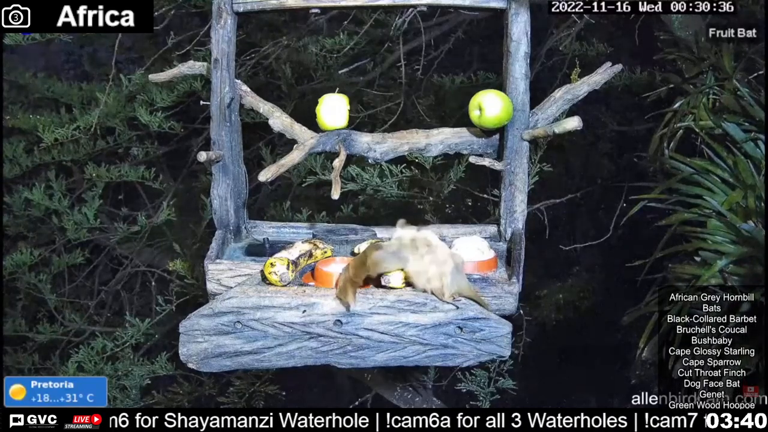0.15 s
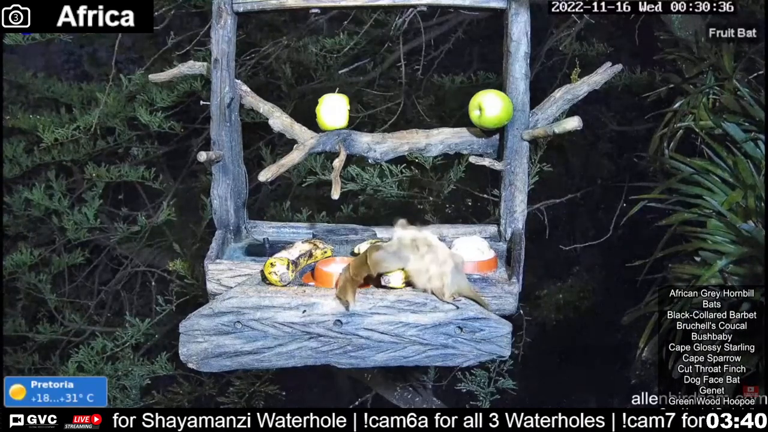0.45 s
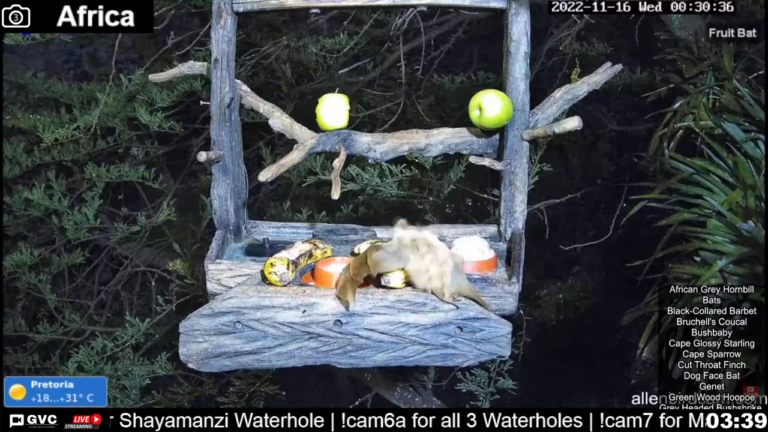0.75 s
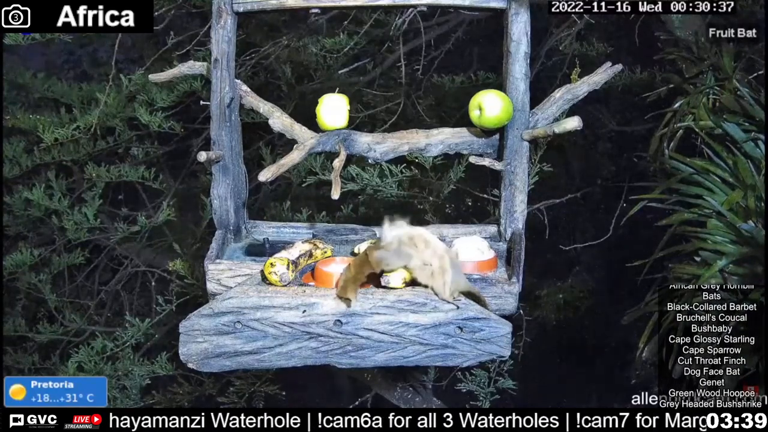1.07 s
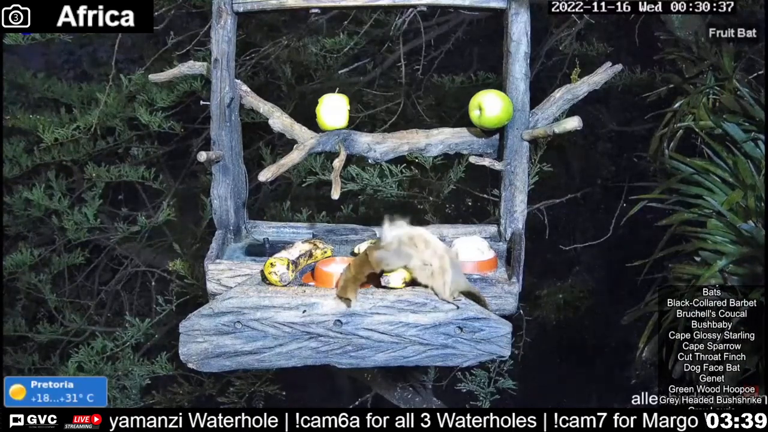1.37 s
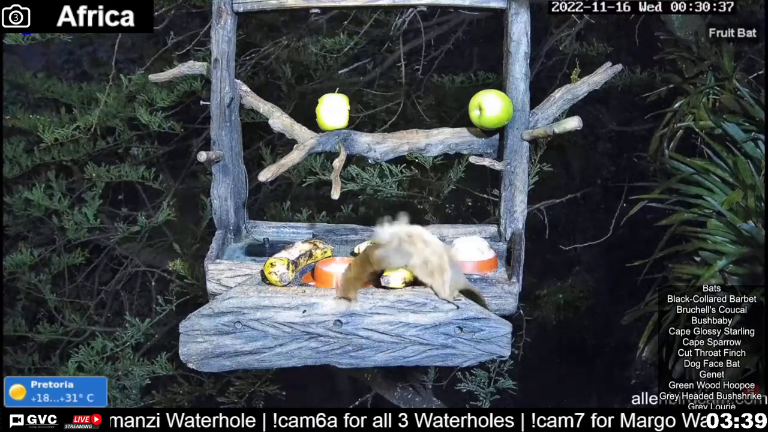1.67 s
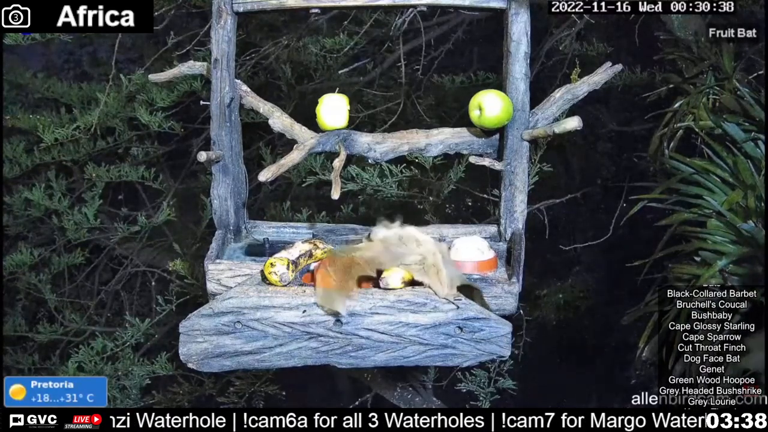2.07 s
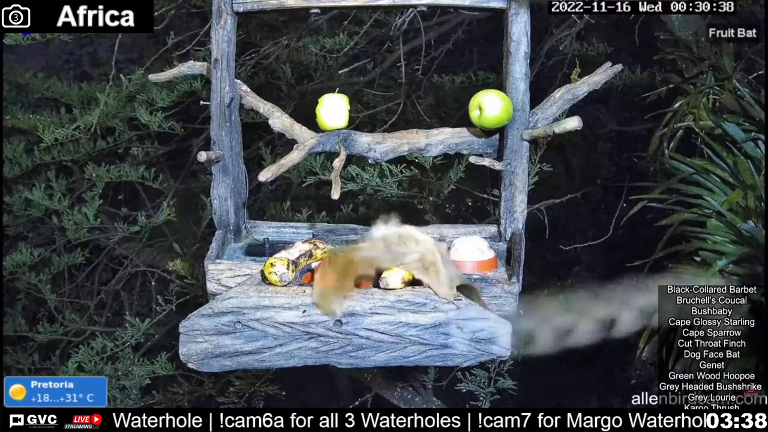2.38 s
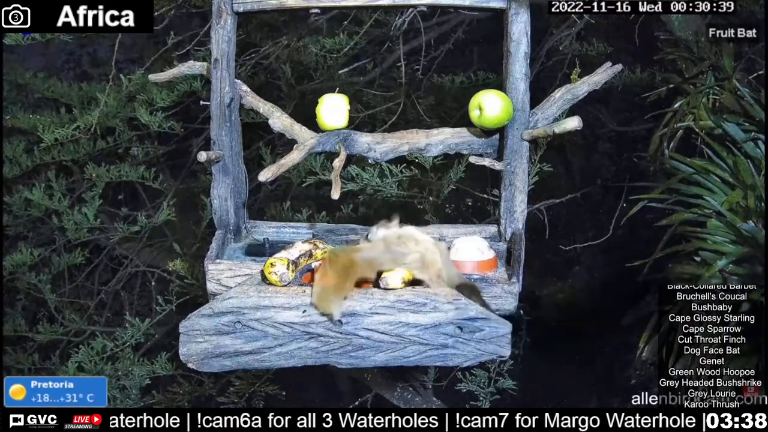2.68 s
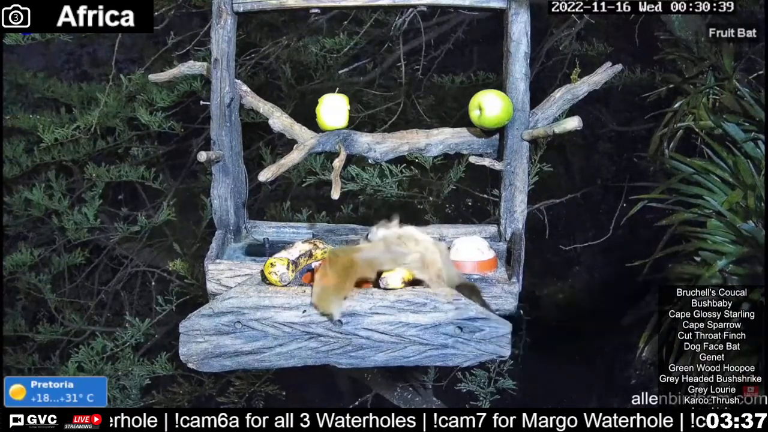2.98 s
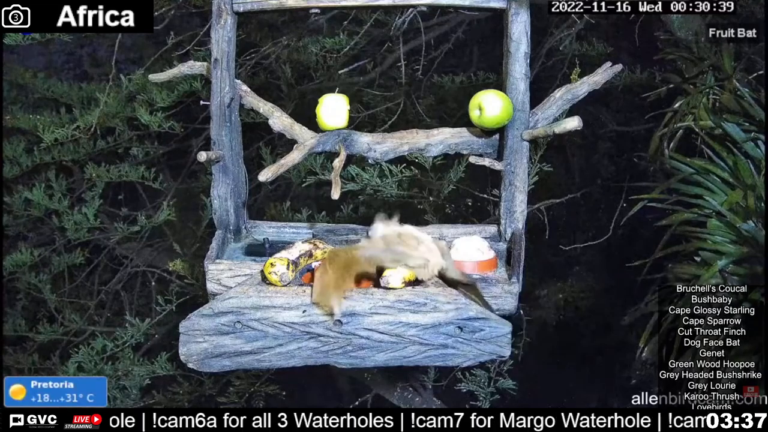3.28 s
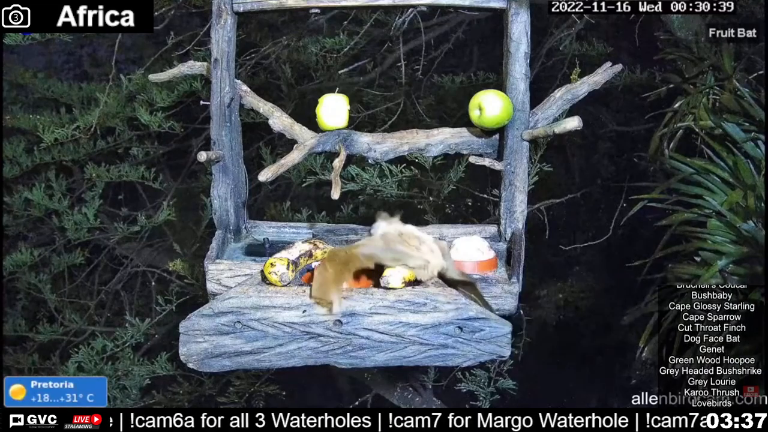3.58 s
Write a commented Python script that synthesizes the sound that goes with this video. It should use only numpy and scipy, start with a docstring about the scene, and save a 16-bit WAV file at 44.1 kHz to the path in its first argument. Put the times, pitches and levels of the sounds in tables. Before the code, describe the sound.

A fruit bat gives short, harmonic falling chirps at about 1.0, 2.0 and 3.3 seconds, ringing briefly among trees. Two near frogs croak in pulsed runs throughout, the lower one busiest around 2.0-2.7, over a swelling distant chorus. High crickets trill intermittently. Wet feeding clicks are sharpest near 1.1 and 1.8. Faint insect whine and soft night hiss continue; sound sits almost entirely right.

```python
"""A fruit bat at a garden feeding table at night: three falling harmonic chirps that ring among the trees.
Two near frogs croak in pulse runs through throat filters; random pulses make the far frog chorus behind.
Two crickets, one near 5.9 kHz and one near 3.8 kHz, trill in short falling whistles.
Feeding animals make wet clicks from noise snaps and smears. Band-passed noise is the far insects,
coloured noise the night air. Nearly all sound is on the right."""
import sys
import numpy as np
from scipy import signal
from scipy.io import wavfile
from scipy.ndimage import uniform_filter1d

SR = 44100
rng = np.random.default_rng(int(sys.argv[2]) if len(sys.argv) > 2 else 0)


def master_out(mix):
    """Clip the mix to full scale and print it as 16-bit PCM to the path in sys.argv[1]."""
    frames = np.transpose(np.atleast_2d(mix))
    ceiling = np.clip(frames, -1, 1)
    pcm = np.round(ceiling * 32767).astype(np.int16)
    wavfile.write(sys.argv[1], SR, pcm)


N = 164934


def amp(db):
    """Decibels to gain."""
    return 10 ** (np.asarray(db) / 20)


def unit(x):
    """Scales to rms 1."""
    return x / np.sqrt(np.mean(x ** 2) + 1e-20)


def smooth_noise(count, size):
    """Noise averaged over a sliding window of size samples, rms 1."""
    return unit(uniform_filter1d(rng.standard_normal(count), size=size))


def read(points, hz):
    """Reads a spectrum on a log-frequency axis."""
    point_hz, value = np.transpose(points)
    return np.interp(np.log(hz + 1), np.log(point_hz + 1), value)


def level(points):
    """Gain over time from a level curve in dB."""
    return amp(np.interp(np.arange(N) / SR, *np.transpose(points)))


def add(mix, start_s, sound):
    """Mixes a sound in at a time."""
    part = mix[max(round(start_s * SR), 0):][:len(sound)]
    part += sound[:len(part)]


def colour(x, points):
    """Causal minimum-phase filter with the given spectrum."""
    log_gain = np.log(amp(read(points, abs(np.fft.fftfreq(8192, 1 / SR)))))
    response = np.exp(np.conj(signal.hilbert(log_gain)))
    taps = np.fft.ifft(response).real[:2048]
    return signal.fftconvolve(x, taps)[:len(x)]


def patchy(x, patch_db):
    """Lets narrow bands of a sound swell and fade at random."""
    z = signal.stft(x, nperseg=512)[2]
    patches = uniform_filter1d(rng.standard_normal(z.shape), size=3, axis=0)
    patches = uniform_filter1d(patches, size=7, axis=1)
    return signal.istft(z * amp(patch_db * unit(patches)), nperseg=512)[1][:N]


# Echo decay among the trees. Each row: frequency in Hz, time to fall 60 dB in seconds.
TREE_DECAY_HZ_S = [(1300, 0.27), (3300, 0.49), (6000, 0.42), (14000, 0.56)]


def trees(x):
    """Scattered echoes from trunks and leaves: sparse random taps, decay set by frequency."""
    taps = rng.standard_normal(SR) * (rng.random(SR) < .06)
    hz, t, z = signal.stft(taps, SR, nperseg=256)
    decay = amp(-60 * t / read(TREE_DECAY_HZ_S, hz)[:, None])
    tail = signal.istft(z * decay * (t > .004), SR, nperseg=256)[1]
    return signal.fftconvolve(x, tail / np.linalg.norm(tail))[:len(x)]


# Bat chirps. Each row: start in seconds, length in seconds, first pitch in Hz, last pitch in Hz,
# fall time in seconds, level in dB before the fades, tilt in dB per harmonic.
CHIRPS = [(1.016, 0.09, 1867, 1644, .034, -36, -1.5), (2.045, 0.065, 1818, 1648, 0.02, -31.5, -1.5),
          (3.33, 0.067, 1832, 1626, 0.01336, -33, -3)]
# Bat mouth resonances. Each row: frequency in Hz, gain in dB.
MOUTH_HZ_DB = [(1650, -13), (3280, -4), (3700, -8.5), (4900, -3.5), (5450, -0.5), (6500, -7.5),
               (7400, -15.5), (8300, -32.5)]
CHIRP_RISE_S, CHIRP_RELEASE_S, CHIRP_ECHO_DB = 0.012, 0.0054, 3
CHIRP_JITTER = .0065  # rms, fraction of pitch


def bat(flutter_db=0.5):
    """Each chirp is a five-harmonic whistle that drops towards its last pitch, shaped by the mouth."""
    out = np.zeros(N)
    for start_s, length_s, first_hz, last_hz, fall_s, db, tilt_db in CHIRPS:
        t = np.arange(0, length_s, 1 / SR)
        jitter = smooth_noise(SR, 60)[:len(t)]
        glide_hz = last_hz + (first_hz - last_hz) * np.exp(-(t / fall_s) ** 1.5)
        hz = glide_hz * (1 + CHIRP_JITTER * jitter)
        phase = 2 * np.pi * np.cumsum(hz) / SR
        tone = sum(amp(read(MOUTH_HZ_DB, k * hz) + tilt_db * k) * np.sin(k * phase) for k in range(1, 6))
        tone *= amp(flutter_db * smooth_noise(SR, 200)[:len(t)])
        rise = np.minimum(t / CHIRP_RISE_S, 1)
        release = np.minimum((length_s - t) / CHIRP_RELEASE_S, 1)
        call = np.pad(amp(db) * unit(tone) * rise * release, (0, SR))
        echo = amp(CHIRP_ECHO_DB) * call.std() * unit(trees(call))
        add(out, start_s, call + echo)
    return out


# Croaks of the higher and lower frog. Each row: start in seconds, level in dB before the frog's gain.
HIGH_CROAKS = [(0.0618, -24), (0.3345, -35), (0.5117, -25.5), (0.637, -26.5), (0.7096, -23), (0.838, -21),
               (0.8881, -22.5), (0.9523, -23.5), (1.007, -21), (1.0797, -20), (1.138, -23), (1.201, -22),
               (1.258, -26), (1.3159, -22), (1.4214, -21.5), (1.4671, -20.5), (1.73, -23.5),
               (1.8475, -22.5), (1.922, -22), (2.5232, -23.5), (2.7351, -23), (2.8924, -20), (2.967, -26.5),
               (3.1525, -21.5), (3.2265, -25), (3.29, -24), (3.4188, -21), (3.4786, -25), (3.5046, -21.5),
               (3.6437, -22), (3.6966, -21.5)]
LOW_CROAKS = [(0.027, -34.5), (0.596, -31.5), (0.669, -33.5), (0.756, -30.5), (1.666, -38.5),
              (1.711, -36.5), (1.993, -29), (2.063, -28.5), (2.137, -31.5), (2.207, -31.5), (2.274, -31),
              (2.34, -30.5), (2.401, -31.5), (2.463, -29.5), (2.572, -29), (2.629, -30), (2.716, -36.5),
              (3.354, -29)]
# Throat resonances of each frog. Each row: frequency in Hz before tuning scatter, relative gain in dB.
HIGH_THROAT_HZ_DB = [(300, -80), (720, -54.5), (850, -19), (1080, -13.5), (1240, 0.5), (1400, -8.5),
                     (1800, -33.5), (2500, -22), (8000, -93.5)]
LOW_THROAT_HZ_DB = [(300, -75.5), (730, -44.5), (830, -4.5), (1130, -1.5), (1400, -10), (1800, -20),
                    (2700, -23), (9000, -89.5)]
HIGH_DB, LOW_DB, CROAK_ECHO_DB = -3.5, 1.5, -7.5
CROAK_PULSE_S, CROAK_FADE_DB = .0052, -2.5  # mean gap and loss from pulse to pulse
CROAK_TUNING = 0.029  # resonance scatter between croaks, fraction


def frog(croaks, throat, gain_db, count=4, scatter_db=1):
    """Each croak is a quick run of fading pulses that ring the throat."""
    out = np.zeros(N)
    for (start_s, db), chance in zip(croaks, rng.standard_normal((len(croaks), count, 2))):
        pulses = np.zeros(2048)
        for k, (late, strong) in enumerate(chance):
            pulse_s = CROAK_PULSE_S * (k + .15 * late * (k > 0))
            add(pulses, pulse_s, amp([k * CROAK_FADE_DB + scatter_db * strong]))
        tuned = np.array(throat) * [1 + CROAK_TUNING * chance[0, 0], 1]
        add(out, start_s, amp(db + gain_db) / 2 * unit(colour(pulses, tuned)))
    return out + amp(CROAK_ECHO_DB) * trees(out)


# Far chorus, its raspy treble and the deep distant croaking.
# Level rows: time in seconds, level in dB before the layer's gain.
CHORUS_LEVEL_S_DB = [(0, -32), (.14, -36), (.25, -53), (.47, -44.5), (.62, -37), (.83, -31), (1.15, -29.5),
                     (1.43, -33), (1.85, -29), (2.33, -37), (2.85, -30), (3.74, -30)]
RASP_LEVEL_S_DB = [(0, -39), (.14, -42), (.28, -62), (.52, -45), (0.78, -41.5), (1.301, -40.5),
                   (1.421, -43), (1.7, -40), (3.049, -41), (3.74, -38)]
DEEP_LEVEL_S_DB = [(0, -48), (.14, -58.5), (.3, -75.5), (.46, -70.5), (.56, -65), (1.15, -51), (1.5, -60.5),
                   (1.95, -58), (2.85, -57.5), (3.74, -53)]
# Spectrum rows: frequency in Hz, relative gain in dB.
CHORUS_HZ_DB = [(250, -65), (720, -55.5), (820, -15), (1020, -10), (1220, 2), (1380, -6), (1550, -13.5),
                (1900, -35.5), (6500, -95)]
RASP_HZ_DB = [(400, -53.5), (1800, -2), (2200, 7), (2650, 7.5), (3000, -4.5), (3300, -2.5), (3650, -9),
              (4050, -11), (4750, -7.5), (5200, -15), (6300, -18), (11000, -80.5)]
DEEP_HZ_DB = [(70, -61.5), (200, -31.5), (340, -14), (455, 7.5), (520, 3), (620, -14), (1200, -58)]


def chorus(spectrum, curve, per_s, spread_db, echo_db, gain_db):
    """Many far frogs: random throat pulses blurred by the trees."""
    hits = (rng.random(N) < per_s / SR) * rng.choice([-1, 1], N)
    pulses = hits * amp(spread_db * (2 * rng.random(N) - 1))
    voices = colour(pulses, spectrum)
    return amp(gain_db) * level(curve) * unit(voices + amp(echo_db) * trees(voices))


def far_frogs():
    """Sums mid chorus, patchy raspy treble and deep distant croaking."""
    mid = chorus(CHORUS_HZ_DB, CHORUS_LEVEL_S_DB, per_s=700, spread_db=3.5, echo_db=-5.0, gain_db=0.5)
    rasp = chorus(RASP_HZ_DB, RASP_LEVEL_S_DB, per_s=800, spread_db=-0.5, echo_db=-1.5, gain_db=-0.5)
    deep = chorus(DEEP_HZ_DB, DEEP_LEVEL_S_DB, per_s=160, spread_db=2.5, echo_db=-2.5, gain_db=1.5)
    return mid + patchy(rasp, patch_db=3.5) + deep


# Trills of both crickets. Each row: start in seconds, length in seconds, mean pitch in Hz at stroke start,
# nominal peak level in dB before the stroke offset and scatter.
TRILLS = [(0.01, 0.17, 5870, -46.5), (0.267, 0.27, 5863, -46), (0.641, .26, 5960, -46),
          (0.715, 0.13, 3910, -45), (1.013, 0.28, 5937, -47.5), (1.373, .55, 5920, -46.5),
          (2.274, 0.44, 5905, -50.5), (2.613, 0.12, 3790, -46), (3.158, 0.28, 5840, -48.5)]
CRICKET_SAG_HZ, CRICKET_PULSE_S = 340, 0.026  # pitch fall and length of one stroke
CRICKET_GAP_S = 0.031  # from stroke start to stroke start


def crickets(echo_db=-1, rough=0.011, scatter_hz=45):
    """Two crickets, near 5.9 kHz and 3.8 kHz: each wing stroke is a short, rough, falling whistle."""
    out, t = np.zeros(N), np.arange(0, CRICKET_PULSE_S, 1 / SR)
    u = t / CRICKET_PULSE_S
    for start_s, length_s, top_hz, db in TRILLS:
        for stroke_s in np.arange(start_s, start_s + length_s, CRICKET_GAP_S):
            jitter = smooth_noise(4096, 24)[:len(t)]
            glide_hz = top_hz + scatter_hz * rng.standard_normal() - CRICKET_SAG_HZ * u
            hz = glide_hz * (1 + rough * jitter)
            whistle = np.sin(np.pi * u) * np.sin(2 * np.pi * np.cumsum(hz) / SR)
            add(out, stroke_s, amp(db - 1 + 2 * rng.standard_normal()) * whistle)
    return out + amp(echo_db) * trees(out)


# Wet feeding clicks. Each row: time in seconds, snap level in dB, smear level in dB, before filtering.
CLICKS = [(0.261, -52, -80), (0.404, -58, -47), (.522, -70, -56), (.59, -67, -54), (1.0883, -41.5, -41),
          (1.815, -34, -55), (2.04, -60, -51.5), (2.436, -70, -56.5)]
# Upper edge, stronger snaps brighter. Each row: snap level in dB, edge in Hz before the Nyquist cap.
CLICK_EDGE_DB_HZ = [(-57, 8100), (-37, 48000)]
# Click spectrum. Each row: frequency in Hz, gain in dB.
CLICK_HZ_DB = [(100, -18.5), (2000, 7.5), (10000, 7.5), (12000, -5), (14400, -1), (15300, -18)]
CLICK_DECAY_S, SMEAR_RISE_S, SMEAR_FALL_S, CLICK_ECHO_DB = 0.0049, 0.0076, .015, -15


def feeding(grain_db=4):
    """A sharp decaying noise snap inside a short crackling smear."""
    out, t = np.zeros(N), np.arange(N) / SR
    hiss = rng.standard_normal(N)
    crackle = unit(hiss * amp(grain_db * smooth_noise(N, 60)))
    for start_s, snap_db, smear_db in CLICKS:
        age_s = t - start_s
        snap = amp(snap_db) * (age_s >= 0) * np.exp(-abs(age_s) / CLICK_DECAY_S) * hiss
        smear_s = np.where(age_s < 0, SMEAR_RISE_S, SMEAR_FALL_S)
        smear = amp(smear_db) * np.exp(-abs(age_s) / smear_s) * crackle
        edge_hz = min(np.interp(snap_db, *np.transpose(CLICK_EDGE_DB_HZ)), SR / 2 - 1)
        out += signal.lfilter(*signal.butter(2, edge_hz, fs=SR), snap + smear + 1e-18)
    out = colour(out, CLICK_HZ_DB)
    return out + amp(CLICK_ECHO_DB) * trees(out)


FAR_INSECT_HZ, FAR_INSECT_WIDTH_HZ, FAR_INSECT_DB = 2915, 240, -48.5


def far_insects():
    """A steady, fuzzy whistle of distant insects: noise in a narrow band."""
    edges_hz = FAR_INSECT_HZ + FAR_INSECT_WIDTH_HZ * np.array([-.5, .5])
    band = signal.butter(2, edges_hz, "band", fs=SR, output="sos")
    return amp(FAR_INSECT_DB) * unit(signal.sosfilt(band, rng.standard_normal(N)))


# Night air and far insects. Each row: frequency in Hz, relative gain in dB.
AIR_HZ_DB = [(120, -43.5), (700, -7), (1300, 7.5), (2300, -5.5), (5200, -12.5), (5750, -13.5),
             (6600, -21.5), (10000, -27), (12500, -38.5)]
AIR_DB = -51  # rms before patches


def air():
    """Soft, slightly uneven hiss of the night: coloured noise with patchy bands."""
    hiss = unit(colour(rng.standard_normal(N), AIR_HZ_DB))
    return patchy(amp(AIR_DB) * hiss, patch_db=3)


# Weak left channel. Each row: frequency in Hz, gain in dB.
LEFT_HZ_DB = [(450, -22), (700, -46.5), (1300, -21), (4200, -34), (4900, -32.5), (6000, -39)]
LEFT_LEAD_S = .00075


def scene():
    """Sums all sources on the right; the left is a faint, filtered, slightly early copy with echoes."""
    frogs = frog(HIGH_CROAKS, HIGH_THROAT_HZ_DB, HIGH_DB) + frog(LOW_CROAKS, LOW_THROAT_HZ_DB, LOW_DB)
    right = bat() + frogs + far_frogs() + crickets() + feeding() + far_insects() + air()
    early = np.pad(right, (0, SR))[round(LEFT_LEAD_S * SR):][:N]
    left = colour(early, LEFT_HZ_DB)
    return np.array([left + trees(left) / 2, right])


EDGE_HZ = 15500


def record(dry):
    """The recorder's band limit: a linear-phase low-pass."""
    taps = signal.firwin(511, EDGE_HZ, window=("kaiser", 9), fs=SR)
    return signal.oaconvolve(dry, taps[None], "same")


dry = scene()
out = record(dry)
master_out(out)
```